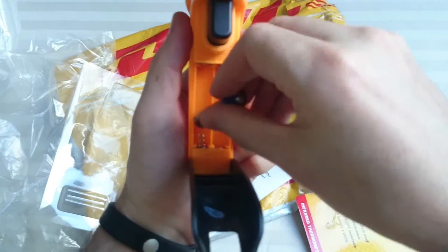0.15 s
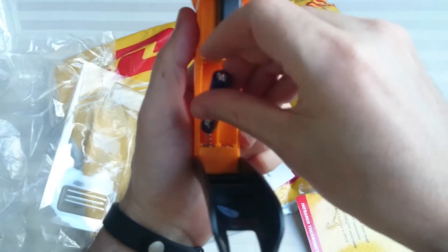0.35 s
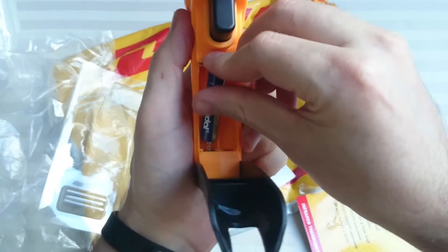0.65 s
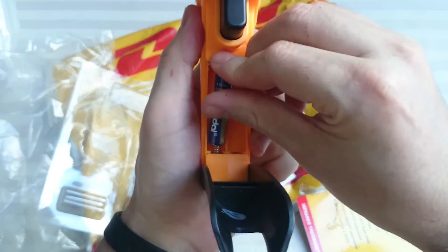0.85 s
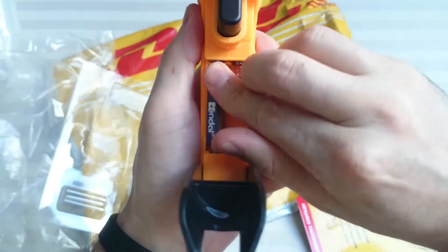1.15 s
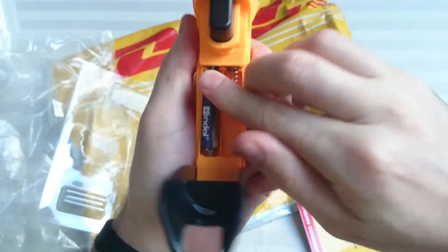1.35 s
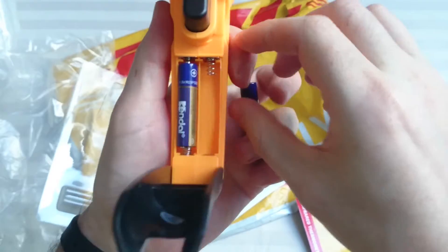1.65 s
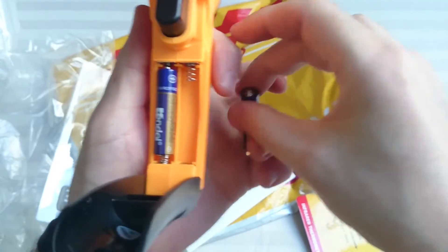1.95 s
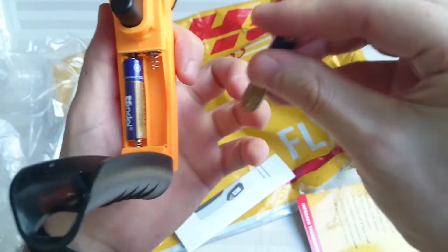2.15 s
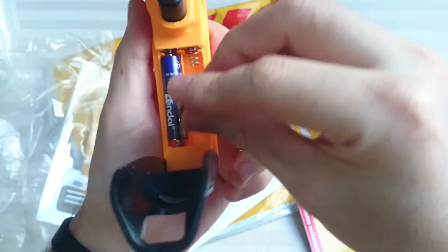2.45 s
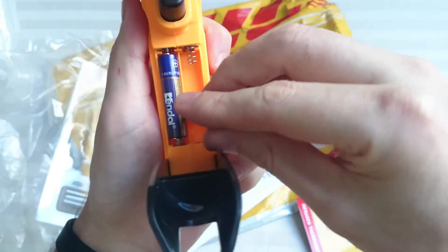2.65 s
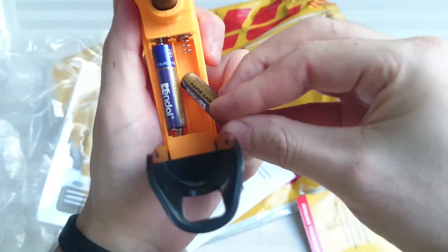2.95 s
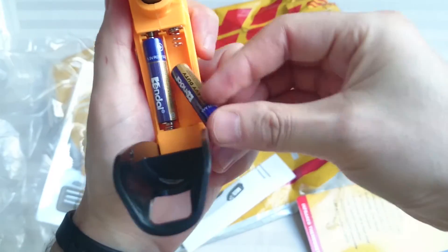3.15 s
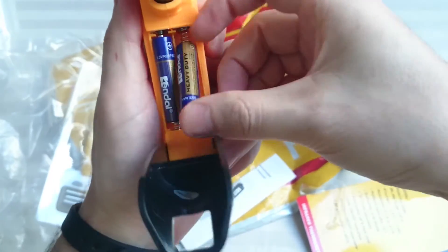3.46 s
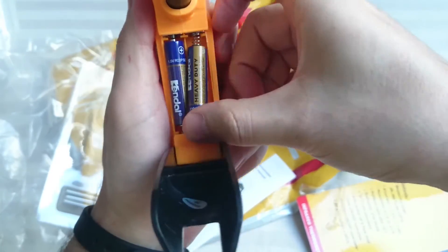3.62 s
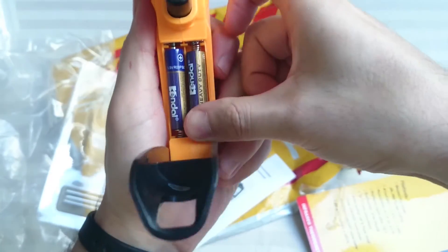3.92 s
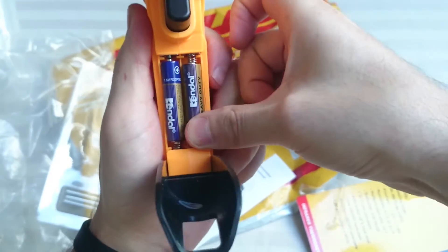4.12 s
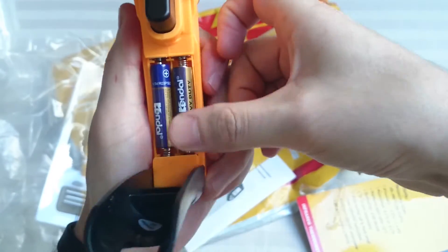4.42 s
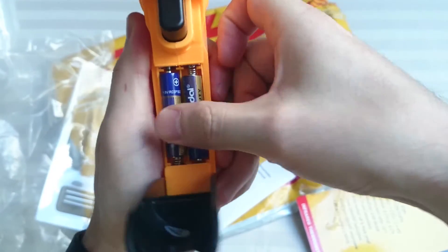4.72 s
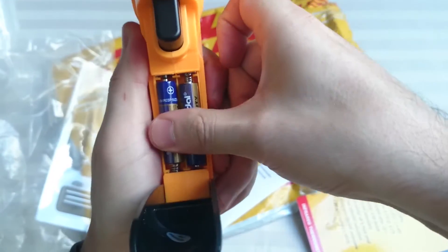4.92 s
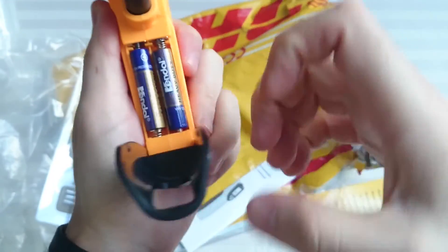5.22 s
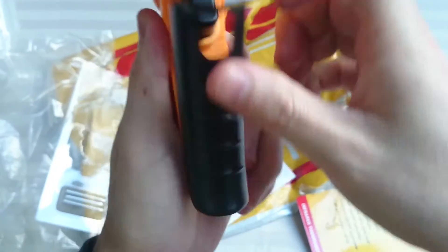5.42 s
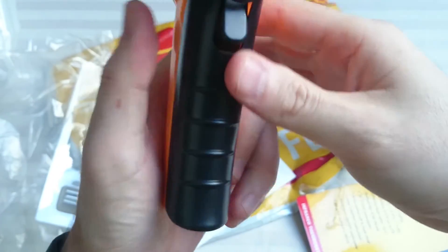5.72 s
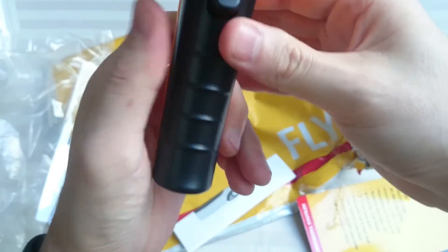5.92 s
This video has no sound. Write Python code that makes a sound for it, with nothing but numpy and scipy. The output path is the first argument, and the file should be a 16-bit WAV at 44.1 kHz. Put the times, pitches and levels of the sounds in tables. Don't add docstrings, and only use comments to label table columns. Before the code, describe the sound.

Small batteries scrape and click into a hollow plastic bay, one snapping in very loudly, then a lid snaps shut and its latch rattles.

```python
import sys
import numpy as np
from scipy import signal
from scipy.fft import rfft, irfft
from scipy.io import wavfile
from scipy.ndimage import uniform_filter1d, map_coordinates

SR = 44100
rng = np.random.default_rng(int(sys.argv[2]) if len(sys.argv) > 2 else 0)


def linear_from_db(decibels):
    return 10 ** (np.asarray(decibels, float) / 20)


def int16_out(signal):
    q = np.round(np.clip(np.atleast_2d(signal).T, -1, 1) * 32767)
    wavfile.write(sys.argv[1], SR, q.astype(np.int16))


N = 268128


def unit(x):
    return x / np.sqrt(np.mean(x ** 2) + 1e-20)


def along(points, hz):
    f, v = np.transpose(points)
    return np.interp(np.log(hz + 1), np.log(f + 1), v)


def resonance(f, hz, width_hz):
    return 1j * f * width_hz / (hz ** 2 - f ** 2 + 1j * f * width_hz)


# (time [s], crack peak [dB], shell pitch [Hz], shell level [dB re crack], edge level [dB re
SNAPS = [
    (2.3956, -42.5, 3370, 13.5, -26),
    (3.2098, -26.5, 3188, -0.5, -13.5),
    (3.2148, -22.5, 3298, 3, -34),
    (3.5788, -1.5, 3806, -6.5, -29.5),
    (5.397, -6.5, 3720, -6.5, -12.5),
         (0.8715, -32, 3100, 7.5, -5),
    (0.9321, -24, 2820, 5.5, -14.5),
    (5.9962, -25, 3180, 2, 6.5),
    (5.9996, -20.5, 2073, 13, -9),
]
LEAD_INS = [
    (.9172, -30, 2400, -2, -24),
    (3.5772, -24, 2300, 13, -20),
    (3.9332, -27, 2600, -8, -15),
    (5.3955, -26, 2300, 3, -15),
]


def snaps():
    hits = contacts(SNAPS + LEAD_INS, rise=0.0013, t60=0.0066, unlike=1.0, hollow_db=-11)
    return radiated(hits, room_db=-22.5)


# (time [s], crack peak [dB])
CHATTER = [
    (5.9996, 3),
    (6.0015, 0),
    (6.0042, -8.5),
    (6.0081, -4),
    (6.0119, -19.5),
    (6.0157, -15.5),
    (6.0185, -18),
]
# (shell pitch [Hz], shell level [dB re crack], edge level [dB re crack])
CHATTER_COLOUR = (7300, -4.5, -2)


def chatter():
    rows = [(*row, *CHATTER_COLOUR) for row in CHATTER]
    hits = contacts(rows, rise=0.00029, t60=0.009, unlike=0.84, hollow_db=-17.5, air=3.1)
    return radiated(hits, room_db=-23)


TICKS = [
    (3.9356, -5.5, 2340, -5, -11),
    (4.408, -37.5, 4400, 6.5, -33.5),
]


def ticks():
    hits = contacts(TICKS, rise=0.00015, t60=0.0023, unlike=0.5, hollow_db=-18, width_hz=410)
    return radiated(hits, room_db=-22)


TAPS = [
    (.5798, -48, 2650, 9, -30),
    (3.4592, -32.5, 2270, 7, -17),
    (3.5018, -32.5, 2508, 2, -37),
    (5.7366, -50.5, 1700, 7, -7),
]


def taps():
    hits = contacts(TAPS, rise=0.00031, t60=0.025, unlike=0.91, hollow_db=-9.5)
    return radiated(hits, room_db=-27)


SCUFFS = [(0.0004, -46.5, 3040, 10.5, -51), (0.0154, -54.5, 3130, 18, -1), (0.1446, -52, 4020, -4, -9),
          (0.1945, -39.5, 2980, 1.5, -11), (0.2284, -40.5, 3170, 4.5, -22), (0.6494, -56, 2920, -3, -37),
          (1.2328, -38, 2320, 1.5, -8.5), (1.4112, -59, 2400, -7, -32), (2.2044, -59, 3770, -23, -10),
          (2.4129, -32.5, 3270, 2.5, -12), (2.9766, -56.5, 3600, 8.5, -27), (4.3565, -51, 4020, -19.5, -6),
          (5.2934, -41, 3200, -2.5, -24), (5.3128, -33, 2360, -2.5, -20), (5.7994, -67, 2300, 10.5, -1.5),
          (0.221, -45.5, 2460, 12, -11),
    (2.383, -55, 3830, -11, -23),
    (5.28, -45.5, 4160, -24, -17),
    (5.362, -32.5, 2600, 0.5, -16),
    (5.382, -54, 2570, 22.5, -30.5),
    (5.979, -78, 3000, -11, -20.5),
]


def scuffs():
    hits = contacts(SCUFFS, rise=0.00017, t60=0.041, unlike=0.9, hollow_db=-12.5)
    return radiated(hits, room_db=-22)


RUBS = [(.165, -49.5, 3030, 3.5, -13), (2.75, -53.5, 4300, -18, -20.5), (2.785, -55, 2600, 4.5, -7),
        (2.808, -43, 3100, 6.5, -30), (3.19, -55.5, 3180, 3.5, -19), (3.438, -57, 3600, 8, -24),
        (3.92, -55, 3620, -11, -53), (4.262, -53.5, 4215, -20, -5), (4.685, -46.5, 4084, 4.5, -9.5),
        (5.608, -48.5, 4040, 2.5, -6)]


def rubs():
    hits = contacts(RUBS, rise=0.006, t60=0.03, unlike=1.0, hollow_db=-17.5)
    return radiated(hits, room_db=-21)


def contacts(rows, rise, t60, unlike, hollow_db, width_hz=1000, air=0.47, size=2048):
    s, db, shell_hz, shell_db, edge_db = np.transpose(rows)[:, :, None, None]
    t, f = np.arange(size) / SR, np.fft.rfftfreq(size, 1 / SR)
    chance = rng.standard_normal((len(rows), 4, 3, size))
    force = (1 - np.exp(-t / rise)) ** 2 * linear_from_db(-60 * t / t60)
    bursts = rfft((chance[:, :, :1] + unlike * chance[:, :, 1:]) * force)
    bay_db = hollow_db + 0.86 * shell_db - 0.12 * db
    crack = resonance(f, 5667, 1700) ** 2
    shell = resonance(f, shell_hz, width_hz) * resonance(f, shell_hz, 3500)
    bay = resonance(f, 1400, 1100) ** 2
    edge = resonance(f, 11000, 12000) ** 2 * (resonance(f, 9000, 3000) - air * resonance(f, 14900, 1700))
    body = resonance(f, 3500, 6800) ** 2
    direct, power = 0, 0
    for k, (level, shape) in enumerate([(0, crack), (shell_db, shell), (bay_db, bay), (edge_db, edge)]):
        wave = irfft(bursts[:, k] * shape * body, size)
        wave = linear_from_db(db + level) * wave / np.abs(wave).max(axis=(1, 2), keepdims=True)
        direct = direct + wave
        energy = np.mean(np.sum(wave ** 2, axis=2), axis=1)[:, None, None]
        gain = np.abs(shape) ** 2
        power = power + gain * energy / np.mean(gain, axis=-1, keepdims=True)
    return s.ravel(), direct, np.sqrt(power)


# (time [s], left minus right [dB])
PLACE = [(.2, 3.5), (.9, -2.5), (1.2, -12), (2.4, -2), (2.8, -2.5), (3.2, -3), (3.5, -3.5), (3.58, 4.5),
         (3.93, -6), (4.4, -0.5), (4.7, -2.5), (5.35, -2), (5.4, 3.5), (6, -4)]


def radiated(hits, room_db):
    out = np.zeros((2, N + SR))
    s, direct, spectra = hits
    for start, near, far in zip(s, walls(direct), room(spectra, room_db, size=SR // 2)):
        lean_db = np.interp(start, *np.transpose(PLACE)) * np.array([[0.5], [-0.5]])
        here = out[:, round(start * SR):]
        here[:, :near.shape[1]] += near * linear_from_db(lean_db)
        here[:, :far.shape[1]] += far * linear_from_db([[-1.5], [1.5]])
    return out


# (delay [s], level [dB])
WALLS = [
    (.0022, -16.5),
    (.0095, -17),
    (.016, -20),
    (0.026, -33),
]


def walls(direct):
    out = direct
    for delay, db in WALLS:
        gain = linear_from_db(db + 2 * rng.standard_normal((len(direct), 2, 1)))
        out = out + np.roll(direct, round(delay * SR), axis=2) * gain
    return out


# (frequency [Hz], t60 [s])
ROOM = [(700, 0.24), (2500, 0.5), (6000, 0.45), (9000, .34), (13000, 0.67)]
# (frequency [Hz], level [dB])
ROOM_COLOUR = [(500, 4), (1500, -8), (2500, -7.5), (3100, -6.5), (3900, -4), (4700, -9.5), (5600, -4.5),
               (6500, -10), (8000, -5.5), (11000, -15), (15000, -8)]


def room(spectra, room_db, size):
    hz, t, z = signal.stft(rng.standard_normal((len(spectra), 2, size)), SR, nperseg=256)
    bands = unit(uniform_filter1d(rng.standard_normal((len(spectra), 1, len(hz), 1)), size=3, axis=2))
    lumps = uniform_filter1d(rng.standard_normal(z[:, :1].shape), size=12, axis=2)
    lumps = unit(uniform_filter1d(lumps, size=2, axis=3))
    low_cut = 1 + (800 / (hz[:, None] + 1)) ** 4
    colour = spectra[..., ::8, None] * linear_from_db(along(ROOM_COLOUR, hz) - 12)[:, None] / low_cut
    decay = linear_from_db(-60 * t / along(ROOM, hz)[:, None])
    z = z * colour * linear_from_db(2.2 * bands + 2.5 * lumps) * decay
    tail = signal.istft(z, SR, nperseg=256)[1][..., :size]
    return linear_from_db(room_db) * tail * (1 - np.exp(-np.arange(size) / SR / 0.001))


def handling():
    out = snaps() + chatter() + ticks() + taps() + scuffs() + rubs()
    right_lag = 7
    return np.array([out[0, :N], np.pad(out[1], (right_lag, 0))[:N]])


# (time [s], frequency [Hz], level [dB], t60 [s])
LID_RING = [
    (1.831, 385, -76.5, 1),
    (5.395, 1372, -37.5, 0.1),
    (5.739, 1690, -55, .04),
    (5.996, 69.5, -41, 0.15),
    (5.999, 222, -48, 0.06),
    (6, 323, -47, 0.062),
]


def lid_ring():
    t = np.arange(N) / SR
    out = np.zeros(N)
    for s, hz, db, t60 in LID_RING:
        decay = linear_from_db(db - 60 * np.abs(t - s) / t60)
        out += decay * np.sin(2 * np.pi * hz * (t - s)) * (t > s)
    return out * linear_from_db([[-10], [3]])


# (time [s], length [s], level [dB], frequency [Hz])
LID_PANELS = [
    (5.401, .22, -62, 1370),
    (5.401, .16, -57, 2250),
    (5.401, .2, -55, 3100),
    (5.401, .24, -55, 4050),
]


def lid_panels():
    return swells(LID_PANELS, width_hz=150, rise=0.068)


# (time [s], length [s], level [dB], frequency [Hz])
STROKES = [(1.946, 0.24, -73.5, 5580), (1.993, 0.22, -69.5, 4450), (2.017, 0.22, -70.5, 3730),
           (2.083, 0.18, -76, 3030), (2.215, 0.26, -74, 5380), (2.5, 0.1, -65.5, 6100),
           (2.714, 0.25, -65.5, 5720), (4.19, .09, -60, 5440), (4.3, 0.089, -69, 5400),
           (4.579, 0.24, -63, 5510), (4.64, 0.19, -63.5, 4040), (5.16, 0.11, -72.5, 5550),
           (5.167, 0.1, -72, 4330), (5.57, 0.2, -59.5, 5370)]


def squeaks():
    return swells(STROKES, width_hz=430, rise=0.3)


def swells(rows, width_hz, rise, size=16384):
    out, f = np.zeros((2, N + size)), np.fft.rfftfreq(size, 1 / SR)
    for s, length, db, hz in rows:
        noise = rfft(rng.standard_normal((2, size)))
        hiss = unit(irfft(noise * resonance(f, hz, width_hz) ** 2, size))
        swell = np.interp(np.arange(size) / SR / length, [0, rise, 0.7, 1], [0.22, 1, 0.46, 0.13])
        out[:, round(s * SR):][:, :size] += linear_from_db(db) * swell * hiss
    return out[:, :N]


# (time [s], level [dB])
FINGERS = [(0.0, -51), (0.3, -58.5), (0.44, -63), (0.9, -77.5), (1.03, -81), (1.22, -52.5), (1.49, -64),
           (1.8, -82), (2.18, -67.5), (2.5, -64), (3.03, -63), (3.35, -61.5), (3.55, -48), (3.8, -52),
           (4.44, -59), (5.25, -66.5), (5.45, -49), (6.08, -69.5)]
# (frequency [Hz], level [dB per Hz])
SKIN = [(530, -53), (900, -15.5), (1360, -17), (1490, -17.5), (1980, -9.5), (3750, -8), (5000, -18.5),
        (6500, -38.5), (11000, -120)]
# (frequency [Hz], level [dB per Hz])
PORT = [(4300, -29), (5100, -4.5), (5600, 2.5), (6200, -15), (7500, -16)]


def fingers():
    rub_db = np.interp(np.arange(N) / SR, *np.transpose(FINGERS))
    grain_db = map_coordinates(rng.standard_normal(N // 150 + 4), [np.arange(N) / 150], order=3)
    grain = linear_from_db(2.8 * grain_db)
    rub = linear_from_db(rub_db - 11.0) * unit(grain * rush(SKIN, [(1000, 0.1)], patchy_db=0.5))
    hiss = unit(grain * rush(PORT, [(1000, 0.28)], patchy_db=-8))
    return rub + linear_from_db(-74.5 + 0.4 * (rub_db + 64)) * hiss


def rush(spectrum, alike, patchy_db):
    z = signal.stft(rng.standard_normal((2, N + 512)), nperseg=512)[2]
    field = uniform_filter1d(rng.standard_normal(z.shape[1:]), size=6, axis=0)
    field = uniform_filter1d(field, size=12, axis=1)
    pair = rfft(signal.istft(z * linear_from_db(patchy_db * unit(field)), nperseg=512)[1][:, :N])
    hz = np.fft.rfftfreq(N, 1 / SR)
    turn = np.arccos(np.clip(along(alike, hz), -1, 1)) / 2
    mid, side = irfft(pair * linear_from_db(along(spectrum, hz)) * [np.cos(turn), np.sin(turn)], N)
    return unit(np.array([mid + side, mid - side]))


# (frequency [Hz], level [dB per Hz])
FLOOR = [(30, -13.5), (50, -5.5), (75, -7), (130, -5.5), (200, -15.5), (310, -16), (800, -22),
         (1900, -20.5), (4600, -23.5), (5600, -26), (7000, -27), (10000, -40), (15000, -23.5), (16300, -35)]
# (frequency [Hz], coherence [0-1])
FLOOR_ALIKE = [(60, 0.13), (300, 0.1), (700, 0.24)]


def floor():
    return linear_from_db(-71.5) * rush(FLOOR, FLOOR_ALIKE, patchy_db=1.0) * linear_from_db([[-1.5], [1.5]])


def scene():
    return handling() + lid_ring() + fingers() + squeaks() + lid_panels() + floor()


# (frequency [Hz], threshold [dB])
MUTE = [(150, -120), (260, -98), (800, -101.5), (1100, -120), (6500, -120), (8000, -104), (11000, -108),
        (14000, -103), (16000, -110)]


def muted(x):
    hz, t, z = signal.stft(x, SR, nperseg=2048)
    power = np.mean(np.abs(z) ** 2, axis=0)
    low = hz[:, None] < 3000
    smooth = np.where(low, uniform_filter1d(power, size=7, axis=0), uniform_filter1d(power, size=10, axis=0))
    level = np.sqrt(np.abs(smooth) + 1e-20)
    loud_db = 10 * np.log10(power[(hz > 1500) & (hz < 6500)].mean(axis=0) + 1e-20)

    def held(fade):
        return np.maximum.accumulate(loud_db + fade * t) - fade * t

    strain = np.clip(1.53 * (held(92) + 97.5), -4, np.where(low, 5, 1))
    ease = np.clip(held(54) + 63, 0, np.where(low, 11, 6))
    rising = np.clip(loud_db - np.r_[[-100] * 3, loud_db[:-3]], 0, 15)
    waver = unit(uniform_filter1d(rng.standard_normal(len(t)), size=2))
    threshold_db = along(MUTE, hz)[:, None] + strain - ease - rising + 4.7 * waver
    keep = 1 / (1 + (linear_from_db(threshold_db) / level) ** 12)
    passband = ((hz > 35) & (hz < 16450))[:, None]
    return signal.istft(z * keep * passband, SR, nperseg=2048)[1][:, :N]


def top_cut(x):
    return signal.sosfilt(signal.butter(12, 16480, fs=SR, output="sos"), x)


def record(dry):
    clipped = dry / (1 + np.abs(dry / 1.05) ** 6) ** (1 / 6)
    return top_cut(muted(clipped))


dry = scene()
out = record(dry)
int16_out(out)
```